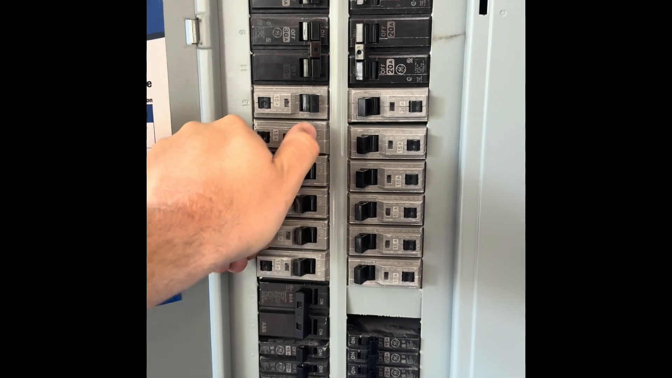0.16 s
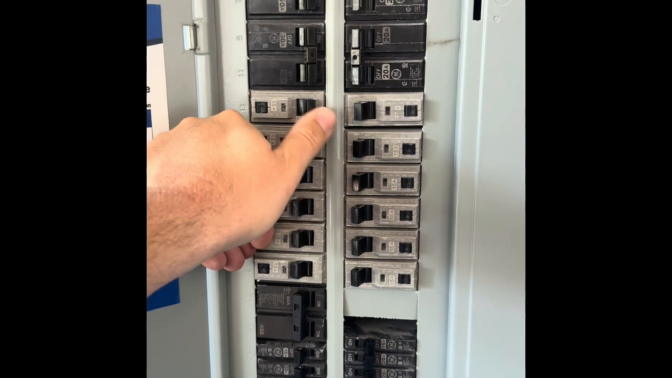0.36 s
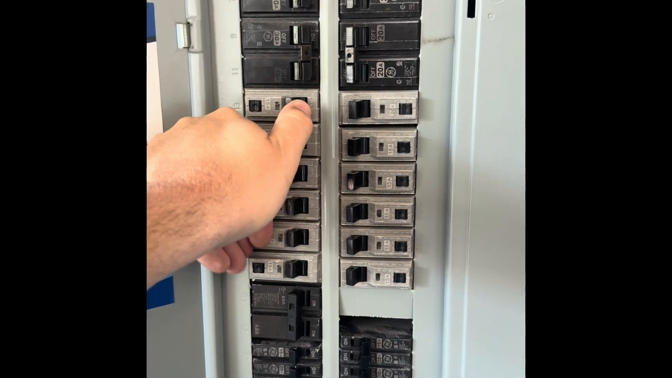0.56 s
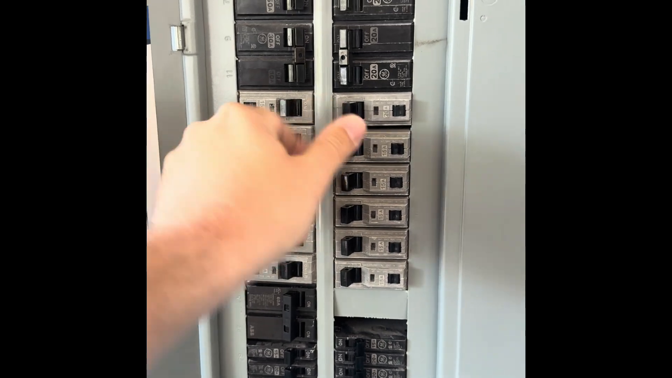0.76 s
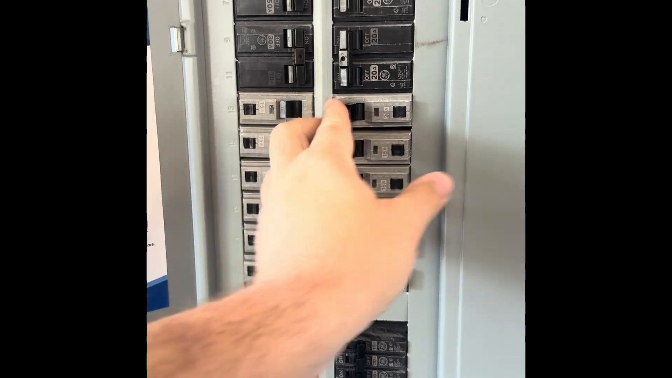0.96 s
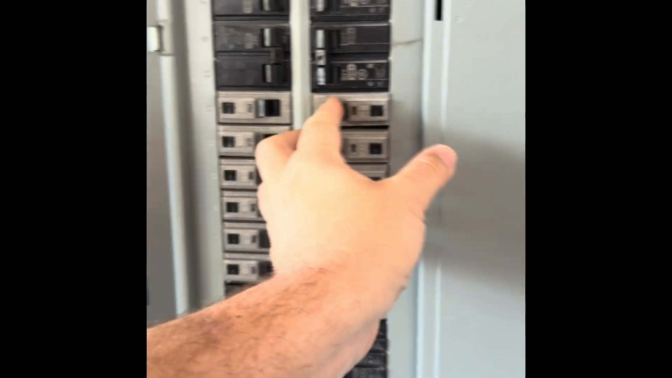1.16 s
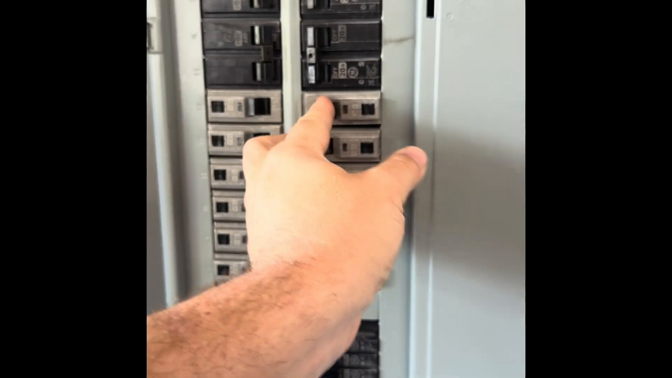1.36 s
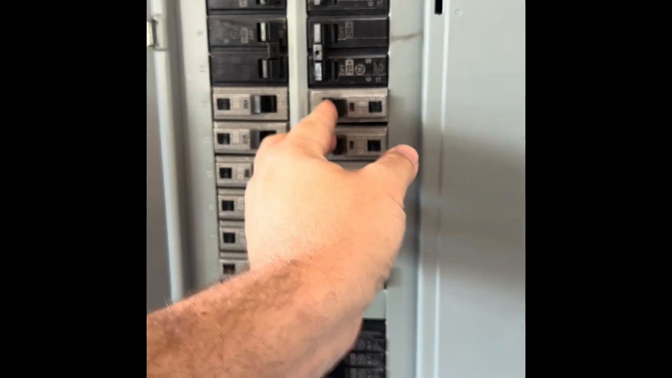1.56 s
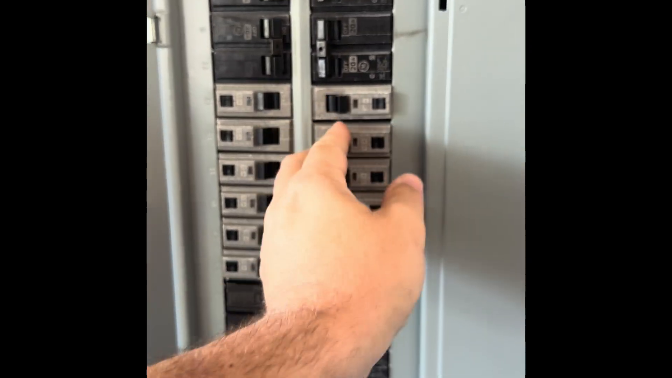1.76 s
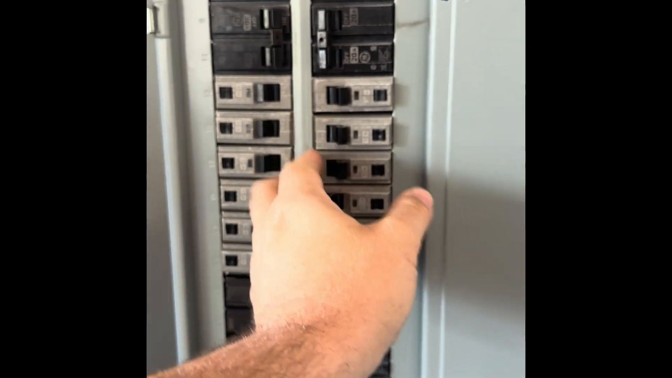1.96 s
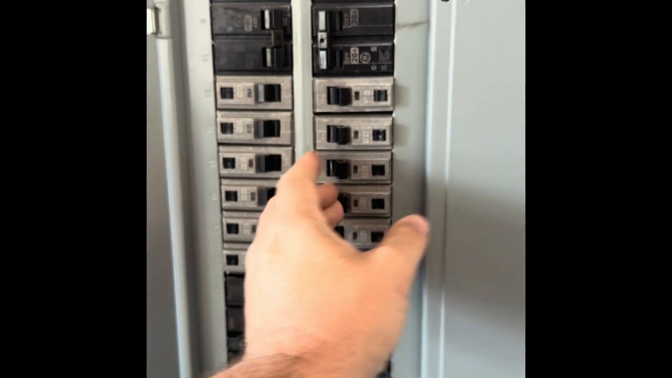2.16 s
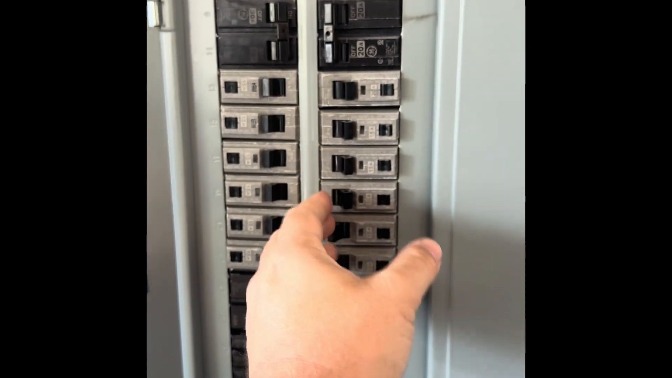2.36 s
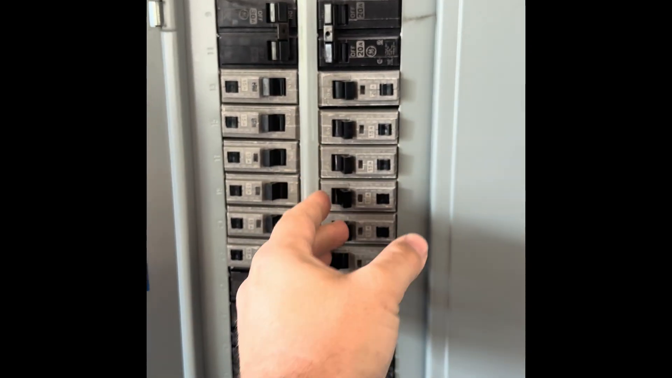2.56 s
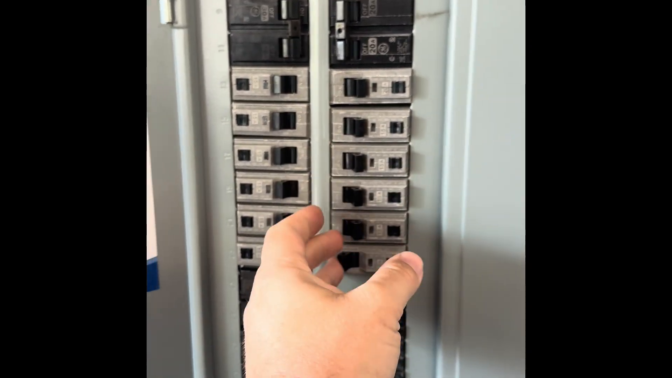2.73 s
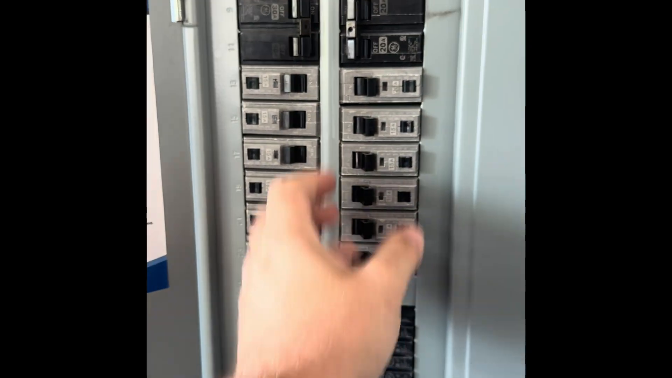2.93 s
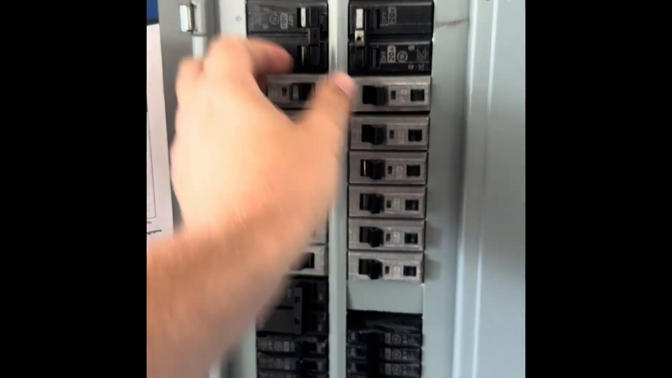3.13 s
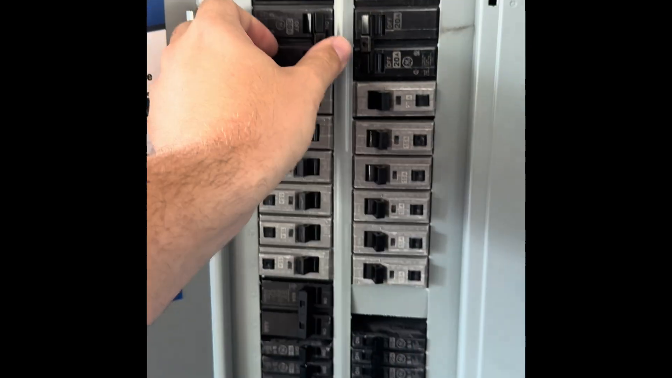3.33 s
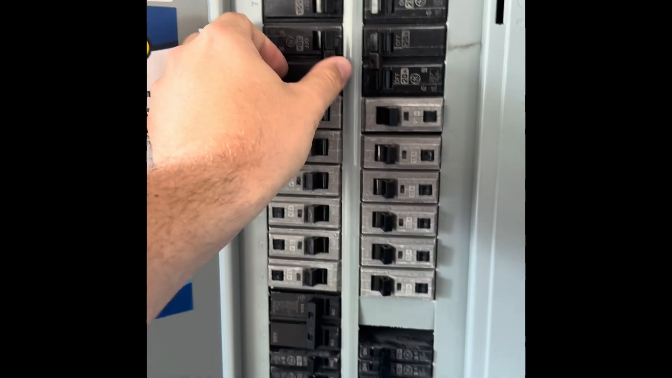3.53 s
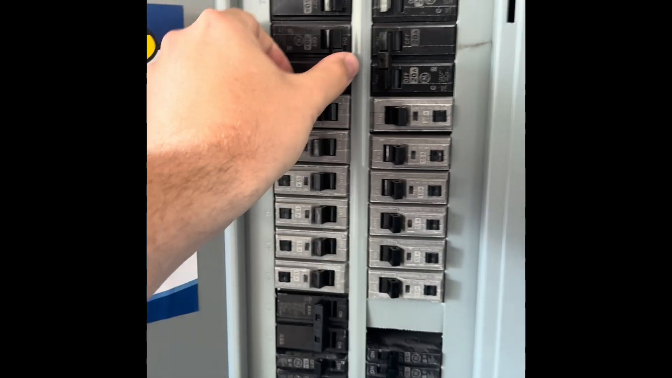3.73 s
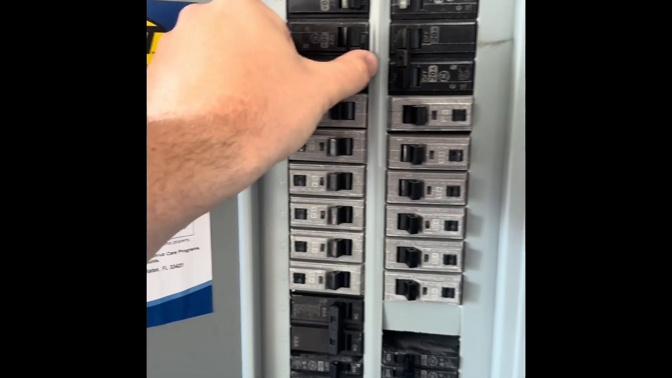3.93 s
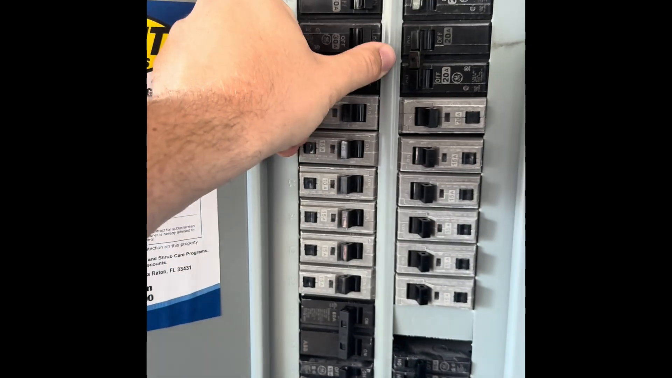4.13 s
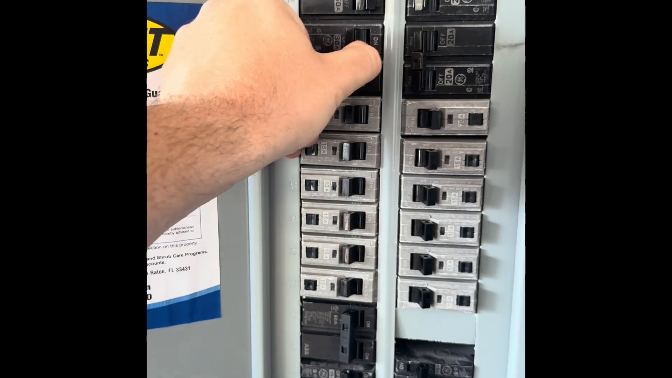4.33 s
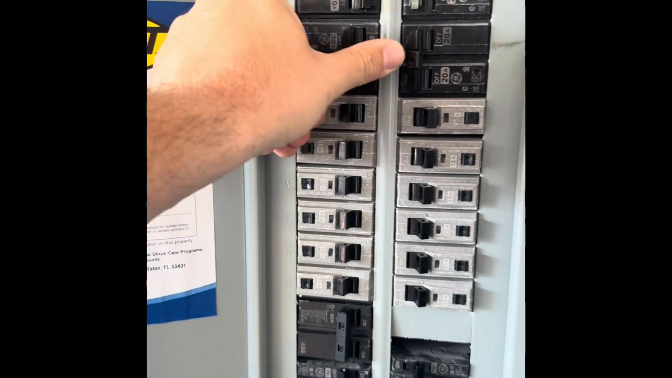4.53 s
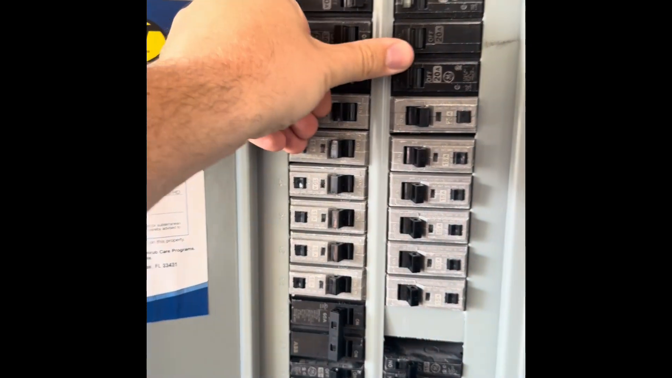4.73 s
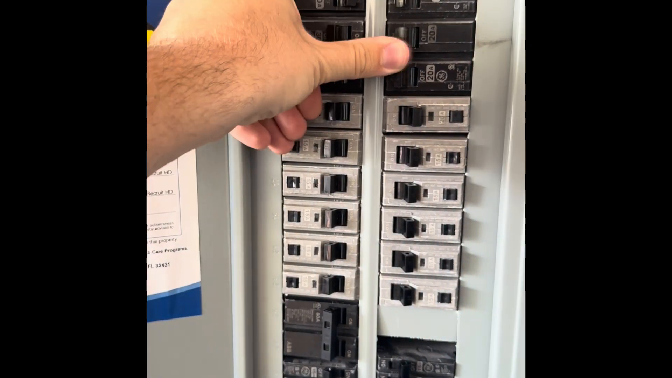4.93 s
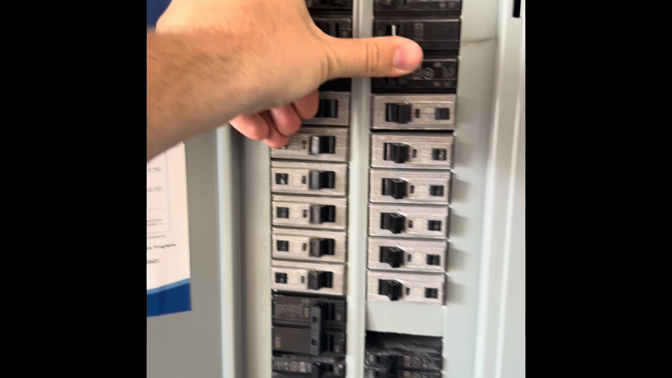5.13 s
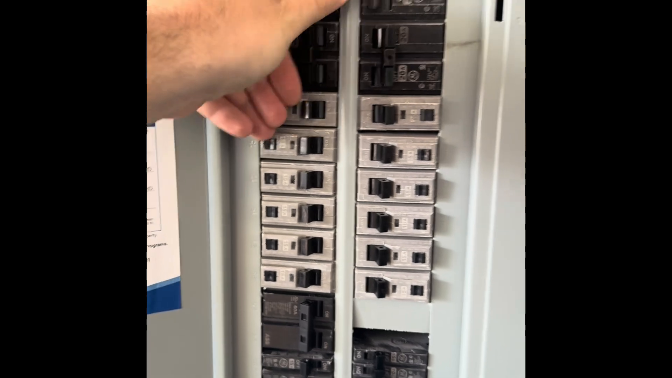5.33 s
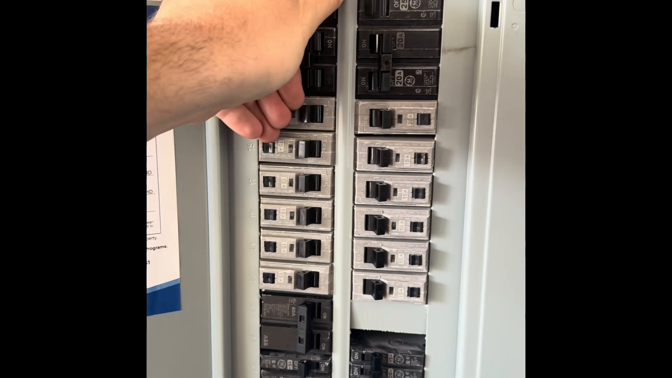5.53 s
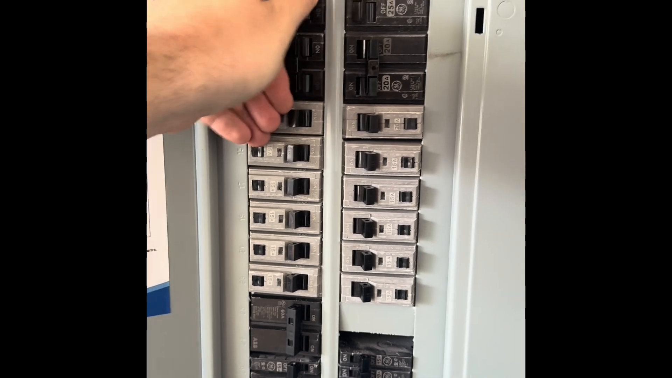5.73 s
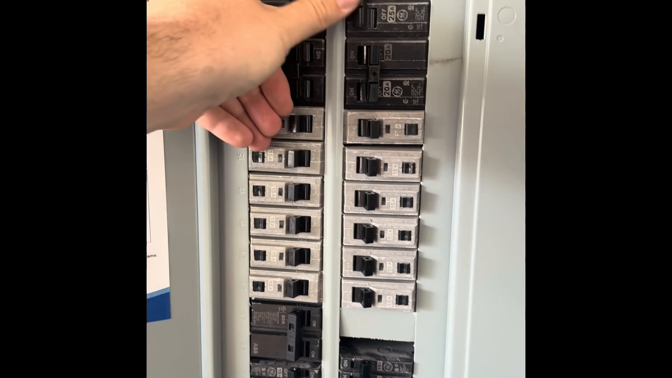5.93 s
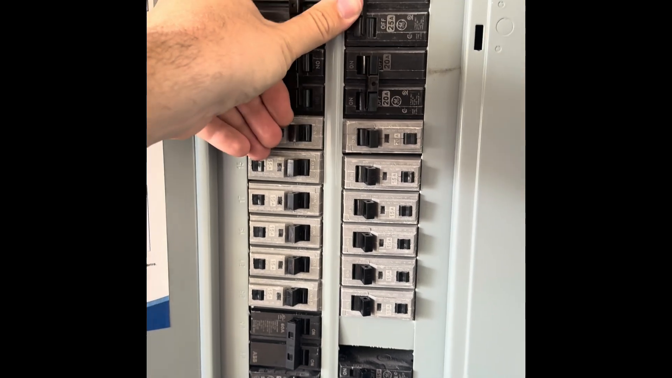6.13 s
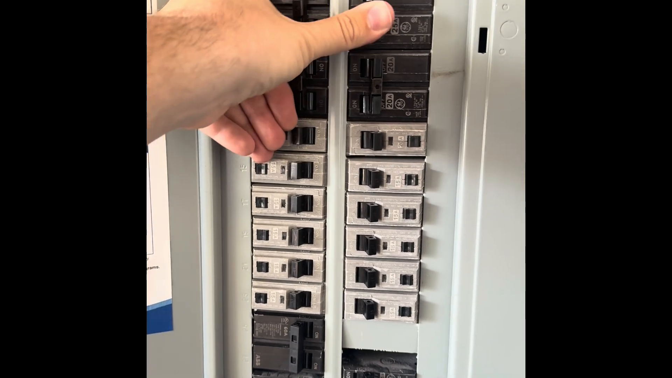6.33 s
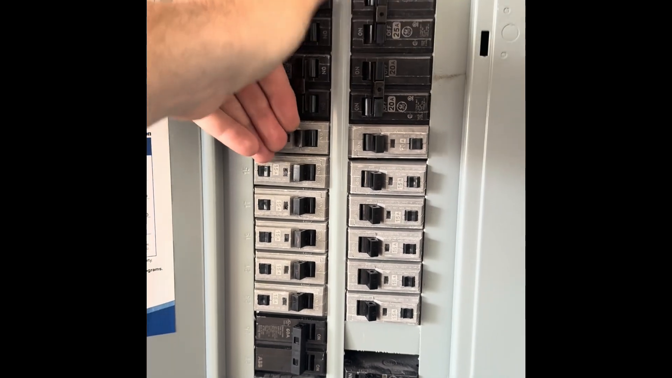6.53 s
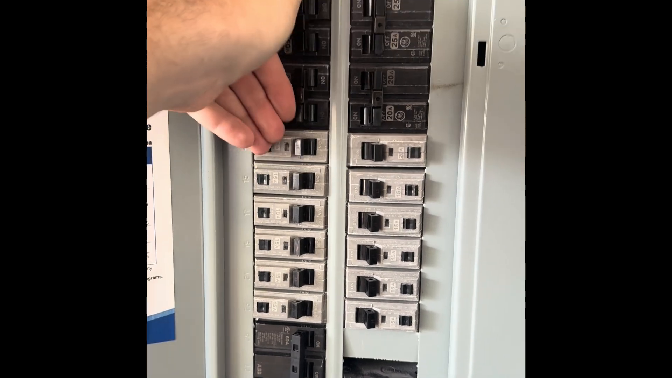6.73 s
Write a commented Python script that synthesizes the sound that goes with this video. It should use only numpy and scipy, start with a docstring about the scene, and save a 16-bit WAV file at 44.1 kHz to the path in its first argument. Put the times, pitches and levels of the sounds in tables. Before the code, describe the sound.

Hard plastic latches release and slam with loud, clipped cracks, each followed by a hollow thud of the steel box and wall and a brief room tail. Eight come quickly and irregularly, then fingers tick and bump during a gap before four deeper ones. Thin metal rings linger faintly; a quiet low hum sinks in pitch midway. Close stereo microphones, small hard room.

```python
"""Twelve breakers switched off in a steel panel

A hand flips the breakers one by one, close to a pair of microphones in a small hard room.
Each latch lets go and the contact arm slams: noise bursts shaped by the resonances of the plastic case.
Box and wall answer with a dull thud, fingers tick on the toggles, thin metal sings on as beating sines.
Shaped noise gives rumble, moving air, hiss and echo; a low hum and a thin whine sink as gliding sines."""
import sys
import numpy as np
from scipy import signal
from scipy.fft import rfft, irfft, next_fast_len
from scipy.io import wavfile
from scipy.ndimage import uniform_filter1d

SR = 44100
rng = np.random.default_rng(int(sys.argv[2]) if len(sys.argv) > 2 else 0)


def output_pcm(signal):
    """Save a mono or channel-first signal as 16-bit PCM at the path in sys.argv[1].

    Samples are clipped to [-1, 1] before scaling.
    """
    pcm = np.clip(np.atleast_2d(signal).T, -1, 1) * 32767
    wavfile.write(sys.argv[1], SR, np.round(pcm).astype(np.int16))


N = 298995

HIT = 16384  # samples in one contact sound or echo
TIME = np.arange(N) / SR
AGE = TIME[:HIT]  # seconds since a contact sound began
HIT_HZ = np.arange(HIT // 2 + 1) * SR / HIT
ROOM_DELAY_S = .0112
OPPOSITE = np.array([[1], [-1]])  # signs that set the left and right microphone apart

# The small hard room's answer, band by band. Each row: centre in Hz, level in dB, time to fade by 60 dB in
# seconds, share of the sound unrelated between the microphones from 0 to 1.
ROOM_ANSWER = [(100, 1.5, 0.33, 0), (330, 9.5, 0.48, 0), (696, 6.5, 0.22, 0.5), (1276, 2.5, 0.18, 0.2),
               (2200, -3, .3, 0.11), (3930, 3, 0.36, 0.97), (5270, -2.5, 0.34, 0.1), (8870, 2, 0.38, 0),
               (9800, -7, 0.037, 0), (15000, -8, 0.24, 0)]


def undb(db):
    """Decibels to gain."""
    return 10 ** (np.asarray(db) / 20)


def along(points, hz, column=1):
    """Read a table on a log-frequency axis."""
    rows = np.array(points, float)
    return np.interp(np.log(hz + 1), np.log(rows[:, 0] + 1), rows[:, column])


def add(track, s, sound):
    """Mix a sound in at time s."""
    i = max(int(s * SR), 0)
    track[..., i:i + sound.shape[-1]] += sound[..., :N - i]


def noise(points):
    """Steady noise whose spectrum follows a table of Hz and dB, rms 1."""
    size = next_fast_len(N, real=True)
    hz = np.arange(size // 2 + 1) * SR / size
    spectrum = rfft(rng.standard_normal(size)) * undb(along(points, hz))
    x = irfft(spectrum, size)[:N]
    return x / x.std()


def tone(hz, level):
    """A sine that follows a pitch curve and a level table of seconds and dB rms."""
    db = np.interp(TIME, *np.transpose(level))
    return np.sqrt(2) * undb(db) * np.sin(2 * np.pi * np.cumsum(hz) / SR)


def moving_air(air_db=-53, width_db=-21):
    """Air moving through the room: noise common to both microphones plus a weaker part of opposite sign."""
    # Spectrum of the common part. Each row: frequency in Hz, relative density in dB per Hz.
    common_spectrum = [(70, -10.5), (120, -0.5), (182, -14), (250, -11.5), (350, -15.5), (500, -21),
                       (630, -16), (850, -19.5), (1210, -22), (1700, -32), (2400, -37.5), (4500, -38.5),
                       (9000, -57.5), (11700, -82.5)]
    # Spectrum of the part that differs between the microphones. Each row: Hz, relative dB per Hz.
    side_spectrum = [(100, -35), (350, -16), (600, -3), (1200, -1), (2000, -8), (8500, -14), (11000, -48)]
    side = undb(width_db) * OPPOSITE * noise(side_spectrum)
    return undb(air_db) * (noise(common_spectrum) + side)


def microphone_hiss(hiss_db=-71, drift_db=1.5, drift_step_s=.15):
    """The microphones' own noise, unrelated between the two, swelling and sinking a little together."""
    # Spectrum of the hiss. Each row: frequency in Hz, relative density in dB per Hz.
    hiss_spectrum = [(200, 4), (2500, 2), (5000, -6), (8700, -2.5), (10500, -25), (16000, -42)]
    moments = np.arange(0, N / SR + 1, drift_step_s)
    drift = drift_db * np.interp(TIME, moments, rng.standard_normal(len(moments)))
    return undb(hiss_db + drift) * np.array([noise(hiss_spectrum), noise(hiss_spectrum)])


def rumble(rumble_db=-47):
    """Steady machinery rumble: low noise, alike at both microphones."""
    # Spectrum of the rumble. Each row: frequency in Hz, relative density in dB per Hz.
    rumble_spectrum = [(20, -26), (42, -12), (58, 10.5), (75, 8), (100, 0), (130, -21), (190, -27.5),
                       (500, -49.5), (4000, -110)]
    return undb(rumble_db) * noise(rumble_spectrum)


def hum(first_hz=84.6, drop_start_s=3.5, drop_hz=12, slowing_s=.22):
    """A motor hums at steady pitch, swelling and dipping, then drops exponentially to a lower pitch."""
    # Loudness of the hum. Each row: time in seconds, level in dB rms.
    hum_level = [(0, -53), (.4, -44), (1.4, -50.5), (1.9, -43.5), (3.499, -48), (3.8, -61), (4.35, -48),
                 (5, -70)]
    dropping = np.maximum(TIME - drop_start_s, 0)
    hz = first_hz - drop_hz * (1 - np.exp(-dropping / slowing_s))
    return tone(hz, hum_level)


def resonance(hz, width_hz):
    """Bell-shaped peak of height 1."""
    return 1 / (1 + (2 * (HIT_HZ - hz) / width_hz) ** 2)


def fine_modes(depth_db=2.6, spacing_hz=110):
    """The many small resonances of one plastic part, drawn at random as dB over frequency."""
    spots = np.arange(0, SR / 2, spacing_hz)
    return depth_db * np.interp(HIT_HZ, spots, rng.standard_normal(len(spots))) - depth_db / 4


def colour(x, db):
    """Causal (minimum-phase) filter with the given gain: resonances ring after the blow."""
    cepstrum = irfft(np.log(undb(db)))
    # fold the negative-time half onto the positive one
    cepstrum[1:HIT // 2] *= 2
    cepstrum[HIT // 2 + 1:] = 0
    return irfft(rfft(x) * np.exp(rfft(cepstrum)))


def burst(envelope):
    """Dense chatter under an envelope, with a nearly even spectrum and energy 1."""
    x = rng.standard_normal(HIT) * envelope
    for _ in range(2):
        spectrum = rfft(x)
        even = irfft(spectrum / (abs(spectrum) + 1e-12))
        x = even * (envelope / envelope.max()) ** (1 / 4)
    return x / np.sqrt(np.sum(x ** 2))


def fingers(bands, room_db=-5, rise_share=0.6):
    """Fingers find and load the toggles: light plastic ticks and short rubs; returns near sound and echo."""
    # Each row: time in seconds, level in dB, hollowness in dB, length (decay constant) in seconds.
    touches = [(0.1272, -13.5, 3, 0.0028), (1.021, -22, 3.5, 0.017), (1.097, 2, -5.5, 0.003),
               (1.414, -4, 1.5, 0.015), (1.654, -16, 5, 0.0025), (2.003, -19, 6.5, .008),
               (2.103, -20, 19, 0.0069), (3.511, -12.5, 0.5, 0.0054), (3.875, -24, -6, .003),
               (4.193, -20.5, 2.5, 0.0047), (4.2274, -12, -0.5, 0.0023), (4.317, -5, 5.5, .006),
               (4.7084, -6, 4, 0.0026), (4.971, -5.5, 5.5, 0.0062), (5.28, -8.5, 4.5, 0.0042),
               (5.445, -29, 16, .004), (5.485, -19, 3, 0.0025), (5.969, -10, 5, 0.0039),
               (6.241, -15, -7.5, 0.013), (6.2622, 3, -2.5, 0.00079), (6.5707, -19.5, -0.5, 0.0027),
               (6.637, -21, 1.5, 0.0027)]
    # Spectrum of touched plastic. Each row: frequency in Hz, level in dB.
    tick_spectrum = [(100, -3), (700, -14), (1400, -13.5), (2300, -2.5), (3800, -7), (6000, -1.5),
                     (9000, -8.5), (11000, -11.5), (15500, -14)]
    near, far = np.zeros(N), np.zeros((2, N))
    for s, db, hollow_db, length_s in touches:
        hollow = hollow_db * np.minimum(1.3 * resonance(2300, width_hz=1300), 1)
        # every spot that is touched favours other resonances of the plastic
        spot = fine_modes() + fine_modes(spacing_hz=400)
        body = along(tick_spectrum, HIT_HZ) + hollow + spot + db
        # a longer rub also starts more gently
        rise = 1 - np.exp(-AGE / (rise_share * length_s))
        touch = rise * np.exp(-AGE / length_s) + undb(-19) * np.exp(-AGE / .008)
        add(near, s - .0005, colour(burst(touch), body))
        add(far, s + ROOM_DELAY_S, echo(body + room_db, bands))
    return near, far


def room_bands(early_db=4, early_s=0.012):
    """For each band of the room: its gain over frequency and its fade in time, lifted early on."""
    bands = []
    for k, (_, db, t60, _) in enumerate(ROOM_ANSWER):
        # each band fades into its neighbours
        share = along([(row[0], j == k) for j, row in enumerate(ROOM_ANSWER)], HIT_HZ)
        fade = np.exp(-np.log(1000) * AGE / t60) * undb(early_db * np.exp(-AGE / early_s))
        bands.append((undb(db) * share, fade / np.sqrt(np.sum(fade ** 2))))
    return bands


def echo(spectrum_db, bands, lumpy_db=0.5, lumpy_s=0.11):
    """The room's tail of one click: each spot on the panel sends out its own pattern of reflections."""
    apart = np.clip(along(ROOM_ANSWER, HIT_HZ, column=3), 0, 1)
    mid, side = rfft(rng.standard_normal((2, HIT)))
    both = mid * np.sqrt(1 - apart / 2) + OPPOSITE * side * np.sqrt(apart / 2)
    ears = undb(spectrum_db) * both
    tail = sum(irfft(ears * gain) * fade for gain, fade in bands)
    # the early tail is slightly uneven in level
    lumps = uniform_filter1d(np.repeat(rng.standard_normal(HIT // 64), 64), size=32)
    return undb(lumpy_db * lumps * np.exp(-AGE / lumpy_s)) * tail


def blow(decay_s, rattle_s, rattle_db):
    """A hard contact followed by the weaker rattle of loose parts."""
    return burst(np.exp(-AGE / decay_s) + undb(rattle_db) * np.exp(-AGE / rattle_s))


def breakers(bands, case_share=0.44, arm_db=5):
    """Faint swell, latch release and slam, heard through the case, then the thud; returns near and echo."""
    # Each row: slam time in seconds, kind of case, snap in dB, latch lead in seconds, latch in dB re slam,
    # room in dB re snap, box resonance in Hz, box in dB, wall in dB, then the colour of the case:
    # knock in dB, hollowness in dB, crack in dB, ring of the contact arm in Hz.
    snaps = [(0.175, "grey", 10.5, .0032, -4, 0, 360, 11, 14.5, 7.5, 3.5, 10.5, 4920),
             (0.5098, "grey", 13, 0.003, -9, -8, 265, 12.5, 16, -5, -2, -2.5, 5910),
             (1.14, "grey", 14, .0029, -4.5, -5.5, 294, 12.5, 13.5, -16.5, 5.5, 5.5, 5760),
             (1.4271, "grey", 14, .0021, 8.5, -1, 238, 8, 20.5, -4.5, 6, 15, 5570),
             (1.7494, "grey", 11.5, 0.0029, -3.5, -6, 321, 13.5, 26.5, -8.5, -3, -2, 6240),
             (2.1256, "grey", 11, 0.003, -6, -5, 328, 10.5, 14.5, 1.5, -5, -4, 5940),
             (2.5486, "grey", 12, 0.0025, 7, -5.5, 280, 14.5, 21.5, -5.5, 2.5, -7.5, 6315),
             (2.8025, "grey", 11, .0024, 2, -4.5, 320, 9.5, 13.5, -1.5, 4, 0.5, 6530),
             (4.3276, "black", 10.5, 0.0012, -4, -1.5, 222, 17, 19.5, 2.5, 0.5, 5.5, 5950),
             (4.9825, "black", 8.5, 0.0013, -11, -1, 252, 12, 17, -7, -2.5, -3.5, 6530),
             (5.6097, "black", 11, 0.0028, -4.5, -5.5, 248, 8, 14, -10.5, 0, -4.5, 5280),
             (6.268, "black", 10, 0.00099, -20, -3, 254, 11, 18.4, -5.5, -3, -3, 5500)]
    # Spectrum shared by all cases. Each row: frequency in Hz, level in dB.
    case_spectrum = [(60, -16.5), (400, -10.5), (1000, -10.5), (1600, -4.5), (2200, -2), (4000, -3),
                     (6000, 2), (9000, -1.5), (12000, -2.5), (15500, 0.5)]
    # Resonances of the two kinds of case. Each row: frequency in Hz, height in dB.
    grey_modes = [(2030, 4), (2580, 3.5), (3050, 0), (8390, 2)]
    black_modes = [(1900, -8), (2470, 8.5), (3350, 0.5), (5200, 5), (8480, 11.5)]
    near, far = np.zeros(N), np.zeros((2, N))
    for (s, kind, db, lead_s, latch_db, room_db, box_hz, box_db, wall_db,
         knock_db, hollow_db, crack_db, arm_hz) in snaps:
        knock = knock_db * resonance(1150, width_hz=1200)
        hollow = hollow_db * resonance(2500, width_hz=1300)
        crack = crack_db * resonance(12500, width_hz=9300)
        shell = along(case_spectrum, HIT_HZ) + knock + crack + hollow + fine_modes()
        modes = (grey_modes if kind == "grey" else black_modes) + [(arm_hz, arm_db)]
        peaks = sum(peak_db * resonance(hz, width_hz=150 + 0.14 * hz) for hz, peak_db in modes)
        # latch and slam share the energy of the snap
        both_db = 10 * np.log10(1 + undb(latch_db) ** 2)
        shell = shell + db - both_db - 10 * np.log10(np.mean(undb(shell + peaks) ** 2))
        # a faint noise swells for some 10 ms before the latch
        swell = undb(latch_db / 2 - 14) * burst(np.exp(-abs(AGE - .01) / 0.0037))
        # the freed arm chatters, dying away through and past the slam
        chatter = np.exp(-AGE / (2.1 * lead_s)) * (1 - np.exp(-AGE / 0.000087))
        latch = undb(latch_db) * burst(chatter)
        slam = blow(decay_s=.0007, rattle_s=.006, rattle_db=-18)
        for start, part in ((s - lead_s - .01, swell), (s - lead_s, latch), (s, slam)):
            add(near, start, colour(part, shell + peaks))
        # the room hears the case from all sides, which evens out its resonances
        add(far, s + ROOM_DELAY_S, echo(shell + case_share * peaks + both_db + room_db, bands))
        # the heavy box and wall take a moment to swing
        add(near, s + .0095, thud(box_hz, box_db, wall_db))
    return near, far


def thud(box_hz, box_db, wall_db):
    """The steel box drums at one main resonance; the wall around it booms lower."""
    # Spectra of box and wall. Each row: frequency in Hz, level in dB.
    box_spectrum = [(60, -22), (170, -18.5), (230, -2), (370, -4), (480, -13), (750, -11.5), (1100, -21),
                    (2000, -23.5), (6000, -56)]
    wall_spectrum = [(25, -29), (60, -24), (105, -0.5), (155, -1.5), (200, -13.5), (400, -28),
                     (2000, -86.5)]
    box_tone = along(box_spectrum, HIT_HZ) + 10 * resonance(box_hz, width_hz=98)
    box = colour(blow(decay_s=0.014, rattle_s=0.065, rattle_db=-4.5), box_tone)
    wall = colour(blow(decay_s=0.0085, rattle_s=0.075, rattle_db=-6), along(wall_spectrum, HIT_HZ))
    return undb(box_db) * box + undb(wall_db) * wall


def metal_rings(spread=.006):
    """Springs and metal parts sing on after a snap, each a pair of close decaying partials that beat."""
    # Each row: time in seconds, lower partial in Hz, its peak in dB, time to fade by 60 dB in seconds.
    ringing_parts = [(1.143, 8270, -49, 1.1), (1.141, 8300, -49.5, .4), (1.143, 5303, -42, .3),
                     (1.143, 2680, -35.5, .17), (1.428, 2126, -46.5, .5), (1.428, 7709, -43.5, .33),
                     (2.125, 7460, -54, 1.1), (2.127, 6410, -39.5, .23), (2.804, 6800, -45.5, .25),
                     (4.33, 3424, -35.5, 0.3), (4.332, 3220, -37, .3), (5.611, 7630, -46, .17)]
    out = np.zeros(N)
    age = TIME[:SR]
    for s, hz, db, t60 in ringing_parts:
        lower = np.sin(2 * np.pi * hz * age)
        upper = .5 * np.sin(2 * np.pi * hz * (1 + spread) * age)
        add(out, s, undb(db) * (lower + upper) * np.exp(-np.log(1000) * age / t60))
    return out


def hand_bumps():
    """The hand bumps the panel, which sets box and wall swinging without a snap."""
    # Each row: time in seconds, box resonance in Hz, box in dB, wall in dB.
    bumps = [(1.896, 309.3, -12.5, 12), (2.106, 620, 12, -12), (2.953, 254, 7.5, 8),
             (3.515, 525, 3.5, -8.5), (3.56, 368, -4.5, -19), (4.197, 217, 0, 4.5), (6.469, 251, 2.5, 15)]
    out = np.zeros(N)
    for s, box_hz, box_db, wall_db in bumps:
        add(out, s, thud(box_hz, box_db, wall_db))
    return out


def whine(start_s=3.2, one_second_hz=3990, sag_hz=15):
    """A power supply runs down: its thin tone sinks with the logarithm of its age, fast and then slowly."""
    # Loudness of the whine. Each row: time in seconds, level in dB rms.
    whine_level = [(3.19, -115), (3.24, -67), (3.309, -77.5), (3.75, -69.5), (4.02, -75.5), (4.35, -115)]
    age = np.maximum(TIME - start_s, 1 / SR)
    return tone(one_second_hz - sag_hz * np.log(age), whine_level)


def ports(x):
    """The two microphone ports hear sound above 500 Hz apart in phase, fully opposed near 12 kHz."""
    # Phase by which the left port lags the right. Each row: frequency in Hz, lag in radians.
    port_lag = [(0, 0), (500, 0), (1700, -.25), (2700, -1.05), (4500, -.4), (5500, .7), (11800, 3.14),
                (16000, 4.2)]
    lag = np.interp(np.arange(N // 2 + 1) * SR / N, *np.transpose(port_lag))
    return irfft(rfft(x) * np.exp(1j * lag / 2 * -OPPOSITE), N)


def scene():
    """Snaps, ticks and panel close by with the room's echo, over the background."""
    bands = room_bands()
    background = moving_air() + microphone_hiss() + rumble() + hum() + whine()
    ticks, tick_echo = fingers(bands)
    snaps, snap_echo = breakers(bands)
    near = ticks + snaps + metal_rings() + hand_bumps()
    return ports(near + tick_echo + snap_echo) + background


def record(dry, top_hz=15900):
    """Full scale clips the peaks, then a steep low-pass cuts the top."""
    low_pass = signal.ellip(10, .2, 80, top_hz, fs=SR, output="sos")
    return signal.sosfilt(low_pass, np.clip(dry, -1, 1))


dry = scene()
out = record(dry)
output_pcm(out)
```